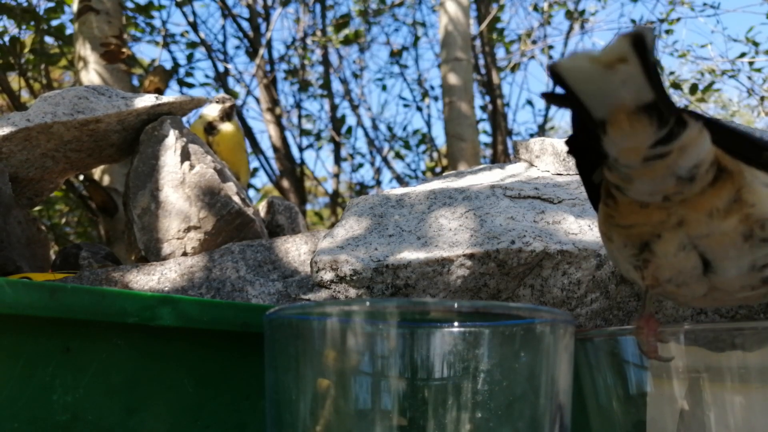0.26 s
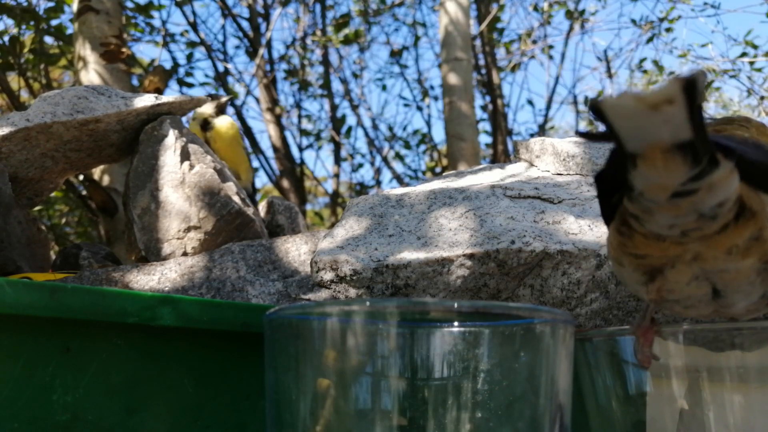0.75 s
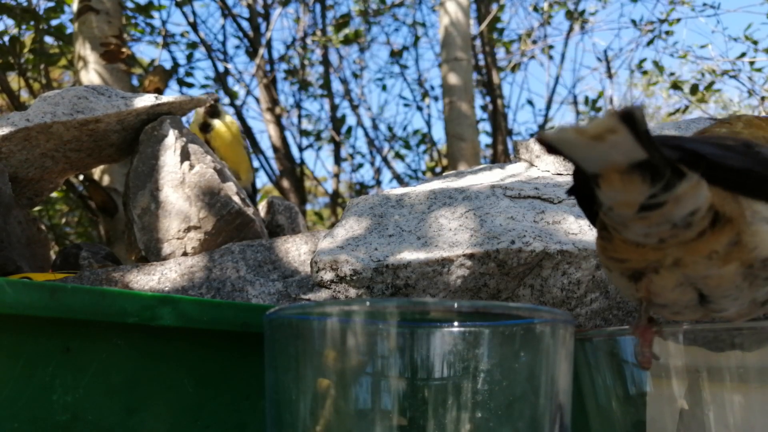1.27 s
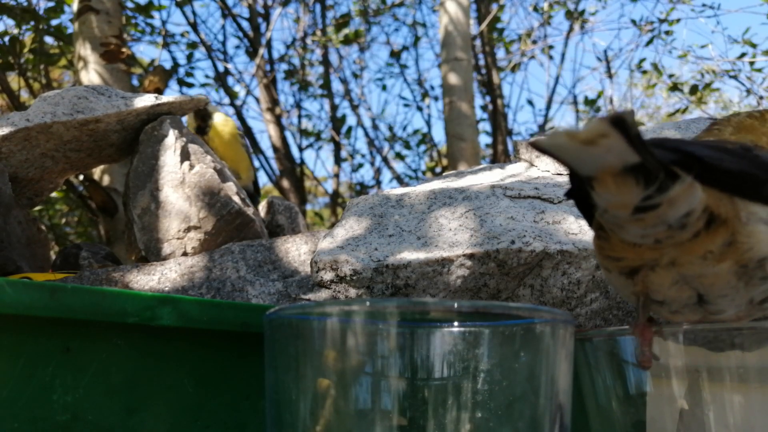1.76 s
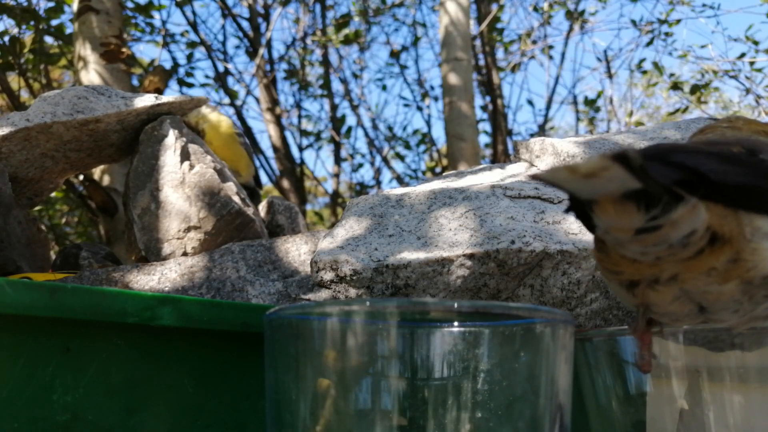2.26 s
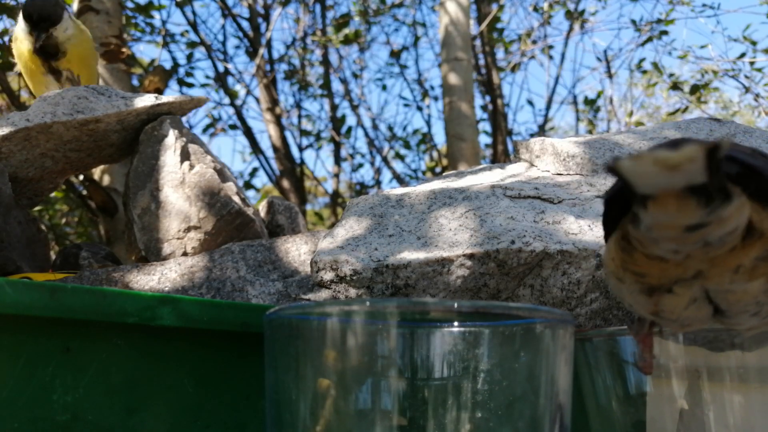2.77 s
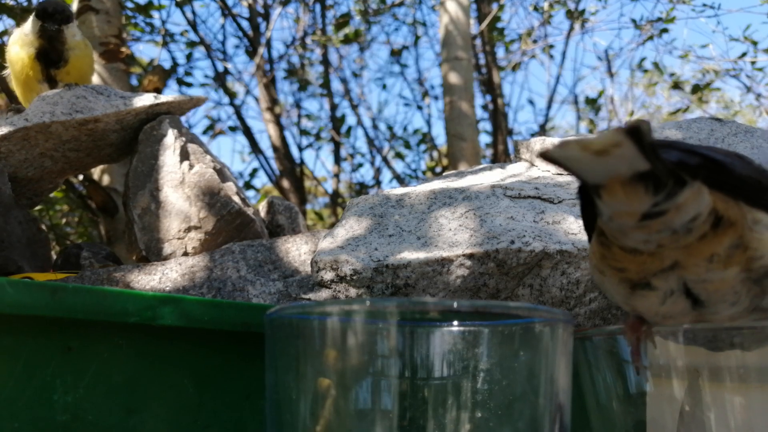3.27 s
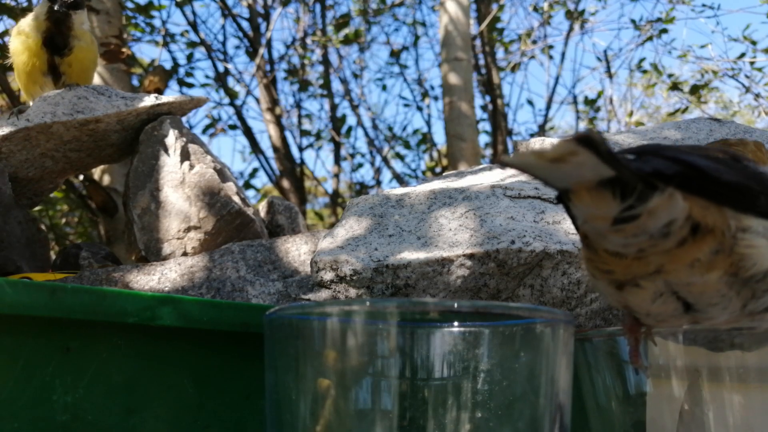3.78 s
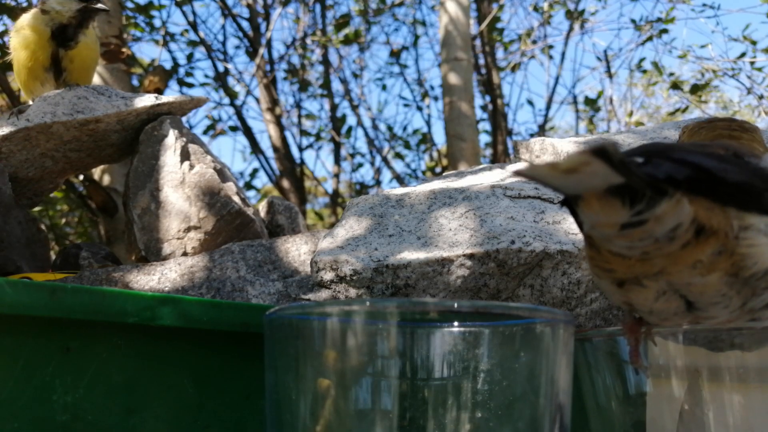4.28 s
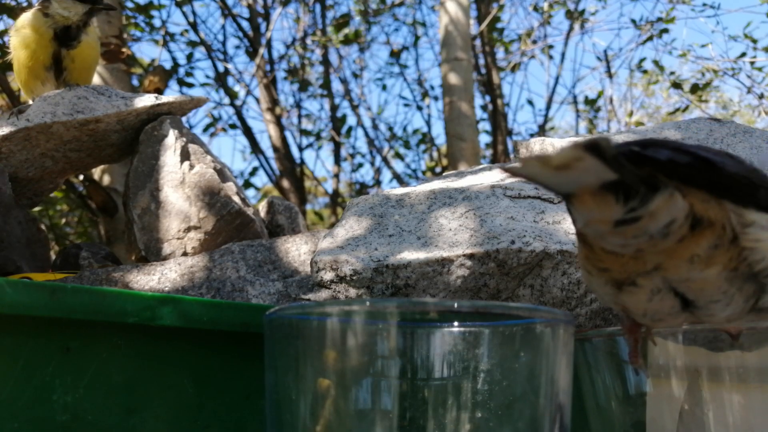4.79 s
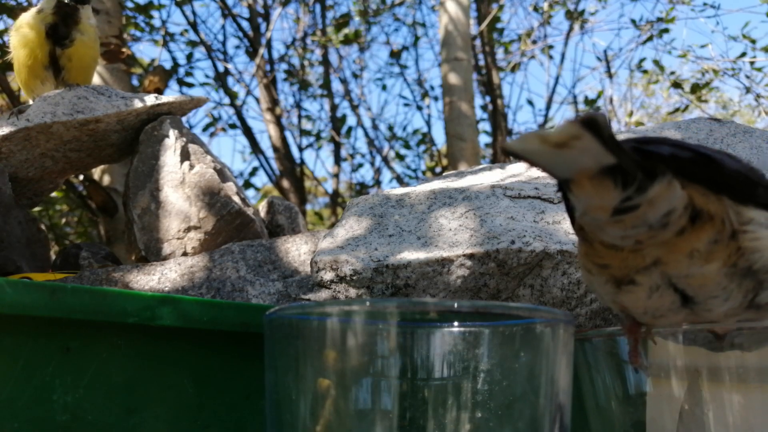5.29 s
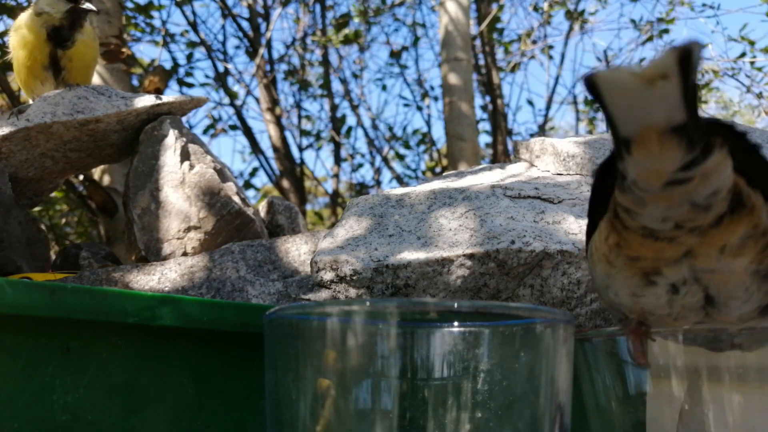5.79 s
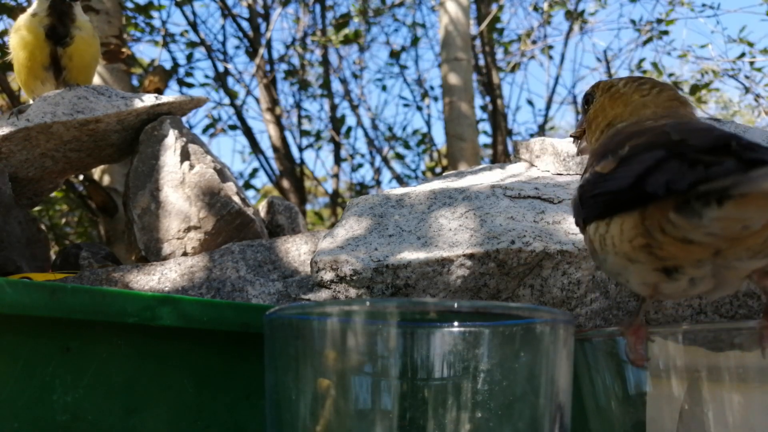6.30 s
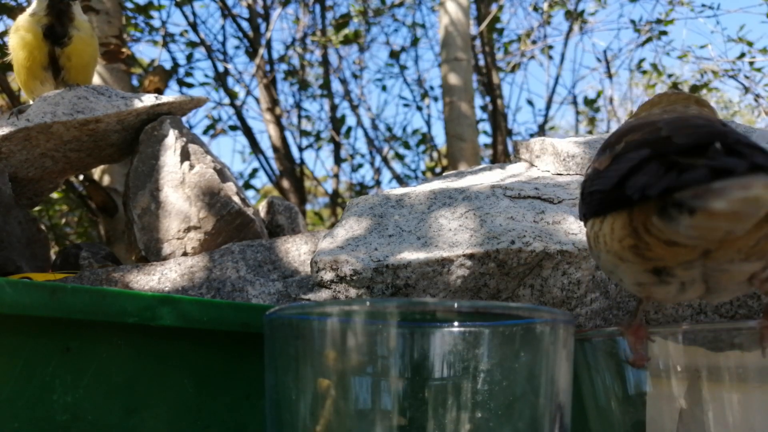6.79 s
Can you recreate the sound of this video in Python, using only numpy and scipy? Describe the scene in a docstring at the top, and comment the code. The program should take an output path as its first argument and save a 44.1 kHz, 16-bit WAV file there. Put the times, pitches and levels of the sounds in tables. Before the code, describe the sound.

Close, dry beak clicks, claw scratches and light thumps on a plastic bird feeder outdoors, mixed with low puffs of wingbeats.

```python
"""At an outdoor feeder, small birds hop, scrabble and peck on a thin plastic tray that carries a
microphone pair and a glass cup. Beaks, claws and feet excite the damped normal modes of the tray,
and claws set the glass ringing. Wing strokes puff on the microphones; they and the footfalls rock
the tray on its mounting. Far off an insect trills by stridulation, over a faint outdoor hush."""
import sys
import numpy as np
from scipy import signal
from scipy.io import wavfile

SR = 44100
rng = np.random.default_rng(int(sys.argv[2]) if len(sys.argv) > 2 else 0)


def wav_record(signal):
    """Record a signal, one row per channel, as 16-bit PCM in the file named by sys.argv[1]."""
    frames = np.transpose(np.atleast_2d(signal))
    bounded = np.clip(frames, -1, 1)
    # unit amplitude maps onto the largest positive 16-bit level
    quanta = np.round(bounded * 32767).astype(np.int16)
    wavfile.write(sys.argv[1], SR, quanta)


N = 310905

# Tabulated levels are relative. Pan is left over right; sharpness is tick over knock.
# Spectral density of the hush: f/Hz, level/dB
HUSH_SPECTRUM = [(20, -3.5), (40, -11), (65, -5.5), (125, -18.5), (250, -13.5), (630, -11.5), (800, -12),
                 (1100, -20.5), (1600, -17), (2500, -20.5), (3200, -25.5), (6300, -28), (7500, -36),
                 (16000, -59.5)]
# Left-right correlation of the hush: f/Hz, coefficient
HUSH_CORRELATION = [(60, 0.079), (130, 0.32), (290, 0.71), (640, 0.71), (1410, -0.45), (3100, -0.093),
                    (6820, 0.13), (15000, 0.15)]
# Side to which the hush leans: f/Hz, pan/dB
HUSH_PAN = [(60, -4), (180, -3.5), (550, -0.5), (1650, -1), (4970, 0), (15000, -13)]

# Sliding claws, one curve per bout: t/s, level/dB, sharpness/dB
SLIDES = [
    [(0.0, -42.5, 4), (0.078, -59.5, 0), (0.144, -57.5, -9), (0.274, -55.5, -1), (0.59, -86, 18),
     (0.95, -85.5, 19)],
    [(3.05, -93, -8), (3.116, -64.5, -1), (3.262, -67, 0), (3.352, -50.5, 1.5), (3.492, -73, -10),
     (3.672, -73, -9.5), (4.3, -80, -3)],
    [(5.49, -70.5, -11), (5.728, -71.5, -12), (5.876, -87, -2), (6.02, -80, 18)],
    [(6.08, -76, -7), (6.184, -78, 3), (6.446, -65.5, 2), (6.546, -63, 1), (6.686, -61, 7),
     (6.92, -67.5, 5), (7.05, -49.5, 1)],
]
# Beak and claw taps: t/s, level/dB, sharpness/dB, pan/dB, favoured knock f/Hz
TAPS = [(.0064,-20,-21,8.5,1710),(.0581,-16.5,-6,6,1870),(.1623,-32.5,-13,3.5,2740),(.1999,-36.5,-10,6.5,1900),
        (.216,-31,-16,5,1950),(.5038,-51.5,13,-14,2160),(.5273,-57,19,-13,3720),(.5457,-33.5,31,-2.5,3720),
        (.5605,-26,23,-4.5,2280),(.6582,-50.5,11,0.5,2150),(.7826,-46.5,-5,3.5,2090),(.9906,-62,28.5,6.5,2260),
        (1.2493,-44,12.5,-4,2100),(1.3394,-50.5,16,-8,2080),(1.4596,-41,3,-1,3000),(1.4623,-39.5,4,-3,2060),
        (1.5021,-43.5,6.5,-2.5,2450),(1.575,-50,6,-3,3600),(1.5864,-35,9.5,0,3480),(1.6118,-51,8,1,1520),(1.6541,-42.5,22,0,4040),
        (1.7324,-55,17,-12,1530),(1.7401,-43.5,33,-4.5,1530),(1.8323,-30,12,-0.5,1630),(2.028,-57.5,28,-3.5,3700),
        (2.0902,-59,13,-5,2930),(2.0986,-55.5,8,-1,2930),(2.1743,-52,18,-13,2456),(2.2518,-52.5,11,-0.5,3500),(2.33,-59,12.5,-2,2400),
        (2.4703,-56,12,3.5,2550),(2.7778,-58.5,-29,1,2100),(2.9701,-55,-10,4.5,2070),
        (3.2508,-28.5,-2.5,-0.5,2670),(3.3031,-35.5,-12,0.5,2950),(3.3576,-34,-9.5,5,2550),(3.3755,-44.5,-2.5,2.5,2800),
        (4.4483,-52,-3,-3,3500),(4.7785,-54,-11,-1.5,3490),(5.5422,-44,-7,-3.5,2100),(5.6047,-44,-21,-3.5,3520),
        (5.6425,-48,-19,-6,3400),(5.671,-45.5,-9.5,-4.5,3490),(5.7478,-46.5,-3.5,-3.5,2900),(5.7632,-37,-6,-5,3700),
        (5.7724,-47,-3,-3,3490),(5.8308,-54,13,-17,3760),(5.8445,-40,0.5,-5,3340),(5.8517,-40,19,1,3520),
        (5.8654,-42,14,1,3700),(5.8722,-43,19,-12,2150),(5.885,-32.5,14.5,0.5,3490),(5.9358,-60,14,-9,2279),
        (6.2218,-50,-22,14.5,1510),(6.2282,-48,-19,-22.5,1470),(6.2339,-50,-19,-7,1520),(6.2473,-61,8,-12,1420),
        (6.3357,-40,3.5,-11.5,4100),(6.37,-52,7,-1,2260),(6.3961,-46,-7,1,2730),(6.4468,-49.5,2,0,2760),
        (6.4587,-55,2,1.5,2570),(6.5181,-46.5,-3,4,2440),(6.5293,-46.5,6,-2.5,2380),(6.6491,-35,-8.5,6,2550),
        (6.6814,-34.5,22,-2.5,1550),(6.6866,-32.5,3.5,1,1440),(6.6969,-35,-11,6.5,1520),(6.7022,-34,8,2.5,1570),
        (6.7136,-40,-13,23,1360),(6.7293,-40,-1,8,1750),(6.7737,-46.5,11,5.5,3420),(6.8866,-55,-19,19,1390),
        (6.9332,-38.5,5.5,6.5,1500),(6.9444,-45.5,-2.5,9,1400),(6.992,-48.5,-2,16,1630),(7.013,-33,-26,15,1670),
        (7.0243,-48,-3,3.5,2930),(7.0404,-40.5,-5.5,24,3730)]
# Claws dragged a short way: t/s, level/dB, sharpness/dB, pan/dB, favoured knock f/Hz
SCUFFS = [(.0206,-28,-4.5,4,2060),(.073,-41,-6,4,2600),(.109,-47,-19,6,2660),(.117,-39,9,0.5,2060),
          (.173,-41,-1,4.5,2040),(.2288,-37.5,-1,2.5,2100),(.282,-47.5,-1,5,2000),(.3075,-42,30,-10,3490),
          (.3496,-55,8,-0.5,1900),(.3823,-42,31,-8,1460),(.442,-51.5,11,-3.5,1330),(.4806,-47.5,24,-3.5,3550),
          (.5236,-44,18,-11,3710),(.645,-67,15,-3,2130),(.7295,-58.5,16.5,1.5,1350),(.7585,-55,27,0,2348),
          (3.102,-48,-12.5,5.5,1610),(3.161,-47.5,-12,4.5,1600),(3.2566,-35,-13,3.5,2460),(3.2886,-44,1,4,2200),
          (3.327,-50,-19,4,2600),(3.503,-65,-21,-8,2330),(3.5613,-54.5,-16,-2,1960),(3.646,-66,-23,-7,2370),
          (3.7497,-60,-27,-10.5,1650),(3.7794,-62.5,-13.5,-6.5,2390),(3.904,-64,-12.5,-0.5,2090),(4.004,-62.5,-15,-9,2670),
          (4.069,-61,-20,-9.5,1540),(4.172,-62,-17,-9.5,2020),(5.5155,-49,-17,-6,3560),(5.786,-57,0,-5.5,3780),
          (6.296,-51.5,-31,-1,2490),(6.346,-55,10,-2,2570),(6.4274,-56,12,-7.5,2450),(6.4936,-51,7,1.5,2590),
          (6.552,-43,-1,3.5,2560),(6.603,-41.5,-2,1.5,2600),(6.6287,-37.5,-9,4,2600),(6.829,-52,16,4,1560),
          (6.876,-52.5,10,6.5,1460),(6.9154,-46.5,1,5,1450)]
# Feet coming down: t/s, level/dB, pan/dB
FOOTFALLS = [(0.006, -14.5, 0.5), (0.036, -43, 0), (0.199, -23.5, -1.5), (0.216, -25.5, 4), (0.262, -27, 2),
             (3.249, -31.5, -18.5), (3.328, -27.5, -3), (3.349, -32, -2), (3.564, -47.5, -19),
             (3.645, -43.5, -6.5), (3.857, -46.5, -6), (6.122, -37, -3.5), (6.147, -41, -8),
             (6.369, -37, -3.5), (6.516, -44.5, -25), (6.697, -24.5, 15), (6.716, -32.5, 19)]
# Claws knocking the cup: t/s, level/dB
CLINKS = [(0.0394, -47), (0.2319, -38.5), (0.7794, -56.5), (1.2496, -55), (3.2694, -41), (5.677, -59),
          (6.0631, -68), (6.0921, -62.5), (6.1185, -48.5), (6.1474, -48.5), (6.1719, -53)]
# Wing strokes at the microphones: t/s, level/dB
WING_STROKES = [(0.09, -32), (0.259, -28), (0.33, -44), (0.37, -39), (0.409, -33), (0.446, -31.5),
                (0.491, -36), (0.529, -54), (0.846, -50), (2.967, -37), (2.994, -46), (3.098, -30),
                (3.127, -28), (3.138, -28), (3.171, -26), (3.184, -61), (3.213, -64), (3.341, -27.5),
                (5.522, -42.5), (6.123, -35.5), (6.145, -43), (6.166, -51), (6.697, -52)]

# Tray modes in four families, from low to high: f/Hz, level/dB, T60/s
THUD_MODES = [(210, -7, 0.022), (306, -3, 0.031), (450, 1, 0.02), (659, 2, 0.02), (732, -1.5, 0.016),
              (903.4, -4.5, 0.034), (1043, -4, 0.015)]
KNOCK_MODES = [(1330, -4, 0.027), (1512, 1, 0.029), (1693, 2, 0.017), (2060, 3.5, 0.02), (2282, -1, 0.031),
               (2483, 4.5, 0.019), (2750, -3.5, 0.038), (2967, -0.5, 0.023), (3490, -3, 0.029),
               (3805, 8, 0.0058)]
TICK_MODES = [(4340, -10.5, 0.013), (4550, -5, 0.0091), (5447, 3, 0.0054), (5975, -3.5, 0.016),
              (6540, -1, 0.0097), (7130, -0.5, 0.013), (7750, -3.5, 0.02), (8255, -4, 0.0086),
              (9290, -6.5, 0.0046)]
TOP_MODES = [(9920, 2.5, 0.0024), (11040, -1, .005), (12140, 1.5, 0.004), (13860, -15.5, 0.0039),
             (14800, -0.5, 0.0033)]
# Extra drive of the lowest and highest families in taps, scuffs and slips: t/s, level/dB
THUD_DRIVE = [(0, 1), (.15, 2.5), (.5, 3), (1.5, 0), (3.1, 5), (3.3, 6), (3.6, 3.5), (4.1, -3.5), (5.5, -6),
              (5.9, -14), (6.2, 2), (6.5, 5.5), (6.7, -5), (7.05, 3)]
TOP_DRIVE = [(0, -28), (.15, -8), (.3, -21), (.5, -26), (.9, -29), (1.25, -16), (1.65, -22), (2.1, -31.5),
             (3.1, -32.5), (3.4, -6.5), (5.55, -24), (5.75, -8.5), (5.95, -2.5), (6.15, -7), (6.4, -12),
             (6.7, -17), (7.05, -12)]
# Broad resonances of the tray on its mounting: f/Hz, bandwidth/Hz, level/dB
SWAY_RESONANCE = [(29.8, 41, 0)]
RUMBLE_RESONANCES = [(73.4, 13, -10), (108.3, 28, -12), (164.4, 120, -4)]
# Modes of the glass cup: f/Hz, level/dB, T60/s
CUP_MODES = [(2140, -17, 0.19), (2057, -16, 0.15), (4854, -5.5, 0.07), (4850, -7.5, 0.078),
             (8550, -17.5, 0.035)]
# Resonances of the insect's wings: f/Hz, bandwidth/Hz, level/dB
INSECT_RESONANCES = [(7380, 660, -5.5), (7970, 230, 0.5), (8270, 83, -2), (8810, 180, -6),
                     (8670, 590, -4.5), (9800, 3000, -9.5)]


def from_db(db):
    """The decibel scale is logarithmic: 20 dB is a factor of ten in amplitude."""
    return 10 ** (np.asarray(db) / 20)


def unit_rms(x):
    """Normalisation: a signal divided by its rms has unit mean power."""
    return x / np.sqrt(np.mean(x ** 2) + 1e-20)


def at_hz(spectrum, hz):
    """Interpolation in log frequency gives every octave equal width."""
    known_hz, values = np.transpose(spectrum)
    return np.interp(np.log(hz), np.log(known_hz), values)


def drift(rate_hz):
    """Low-pass filtering turns white noise into a slow fluctuation of unit rms."""
    step = 40
    pole = np.exp(-2 * np.pi * rate_hz * step / SR)
    noise = rng.standard_normal(N // step + 2002)
    slow = signal.lfilter([1], [1, -2 * pole, pole * pole], noise)[2000:]
    return np.interp(np.arange(N) / step, np.arange(len(slow)), unit_rms(slow))


def ring(impulses, hz, t60):
    """A damped oscillator answers each impulse with an exponentially decaying sine."""
    pole, angle = from_db(-60 / (t60 * SR)), 2 * np.pi * hz / SR
    return signal.lfilter([0, np.sin(angle)], [1, -2 * pole * np.cos(angle), pole ** 2], impulses + 1e-18)


def resonate(force, resonances):
    """Forced vibration: parallel resonances each pass a band of the force; the sum has unit rms."""
    out = 0
    for k, (hz, width_hz, level_db) in enumerate(resonances):
        pole = np.exp(-np.pi * width_hz / SR)
        section = [1, 0.0004, -1, 1, -2 * pole * np.cos(2 * np.pi * hz / SR), pole * pole]
        out = out + (-1) ** k * from_db(level_db) * unit_rms(signal.sosfilt([section] * 2, force))
    return unit_rms(out)


def strike(modes, times, level_db, pan_db, shading, uneven_db, spot_hz=0):
    """Modal superposition: impacts excite each mode unevenly; the far microphone lags and is shaded."""
    scatter = rng.normal(0, 1, (len(times), len(modes), 3))
    lag_s = .00048 * np.tanh(pan_db / 6)
    out = np.zeros((2, N))
    for k, (hz, mode_db, t60) in enumerate(modes):
        impulses = np.zeros((2, N))
        # the spot that is touched favours the modes near its own pitch
        octaves_off = np.abs(np.log2(hz / np.maximum(spot_hz, 1)))
        spot_db = np.where(spot_hz > 0, -np.minimum(27 * octaves_off, 9.5), 0)
        for mic, side in enumerate((.5, -.5)):
            arrivals = np.clip(np.round((times - side * lag_s) * SR).astype(int), 0, N - 1)
            coupling_db = spot_db + uneven_db * (scatter[:, k, 2] + .5 * scatter[:, k, mic])
            heights = from_db(level_db + mode_db + side * shading * pan_db + coupling_db)
            np.add.at(impulses[mic], arrivals, (-1) ** k * heights)
        out += ring(impulses, hz, t60)
    return out


def hush(level_db=-68):
    """Far traffic and leaves form a partly coherent field, flickering in third-octave bands of noise."""
    out, common_drift = 0, drift(1.5)
    edges_hz = 20 * 2 ** (np.arange(30) / 3)
    white = rng.standard_normal((2, 2, N))
    for k, (low, high) in enumerate(zip(edges_hz, edges_hz[1:])):
        bandpass = signal.butter(2, [low, high], "band", fs=SR, output="sos")
        mid, side = signal.sosfilt(bandpass, white[k % 2])
        hz = np.sqrt(low * high)
        correlation = at_hz(HUSH_CORRELATION, hz)
        band = np.sqrt(1 + correlation) * mid + np.sqrt(1 - correlation) * side * [[1], [-1]]
        band_db = at_hz(HUSH_SPECTRUM, hz) + 1.3 * common_drift + 1.9 * drift(16)
        lean_db = at_hz(HUSH_PAN, hz) / 2
        out = out + from_db(band_db) * from_db([[lean_db], [-lean_db]]) * band
    return from_db(level_db) * unit_rms(out)


def slips(median_per_s=1500):
    """Stick-slip friction: sliding claws catch in random clumps, on the side where the bird scuffs."""
    t = np.arange(N) / SR
    curve_s, level_db, sharp_db = np.concatenate(SLIDES).T
    gate = sum(np.clip(np.minimum(t - bout[0][0], bout[-1][0] - t) / .01 + 1, 0, 1) for bout in SLIDES)
    catches = np.flatnonzero(rng.random(N) < gate * median_per_s * from_db(5 * drift(20)) / SR)
    times = catches / SR
    size_db = 3.1 * np.minimum(rng.exponential(1, N), 5)[catches]
    thud_db = np.interp(times, curve_s, level_db) + size_db
    knock_db = thud_db - 8
    tick_db = knock_db + np.interp(times, curve_s, sharp_db)
    scuff_s, _, _, scuff_pan_db, _ = np.transpose(SCUFFS)
    pan_db = np.interp(times, scuff_s, scuff_pan_db)
    return np.array([times, thud_db, knock_db, tick_db, pan_db, np.zeros(len(times))])


def impact_trains(touches, count, length_s, first_db, fade_db, grain_db, thud_db):
    """A touch is a fading train of impacts; the sharper it is, the more it favours high modes."""
    onset_s, touch_db, sharp_db, pan_db, spot_hz = np.transpose(touches)[:, :, None]
    along = rng.random((len(onset_s), count))
    along[:, 0] = 0
    size_db = grain_db * (np.minimum(rng.exponential(1, along.shape), 3) - 1)
    level_db = touch_db + np.where(along == 0, first_db, size_db) - fade_db * along
    knock_db = level_db - np.maximum(sharp_db, 0)
    tick_db = level_db + np.minimum(sharp_db, 0)
    columns = onset_s + along * length_s, knock_db + thud_db, knock_db, tick_db, pan_db, spot_hz
    return np.array([np.broadcast_to(column, along.shape).ravel() for column in columns])


def beaks_and_claws():
    """Impact excitation: rebounding taps, rasping scuffs and slips all drive the same tray modes."""
    taps = impact_trains(TAPS, 12, length_s=.0085, first_db=8.5, fade_db=25, grain_db=2.5, thud_db=-12)
    scuffs = impact_trains(SCUFFS, 34, length_s=.025, first_db=-1, fade_db=9.5, grain_db=3, thud_db=-.84)
    times, thud_db, knock_db, tick_db, pan_db, spot_hz = np.hstack([taps, scuffs, slips()])
    top_db = tick_db + np.interp(times, *np.transpose(TOP_DRIVE))
    thud_db = thud_db + np.interp(times, *np.transpose(THUD_DRIVE))
    return (strike(THUD_MODES, times, thud_db - 16, pan_db, shading=.6, uneven_db=6.5)
            + strike(KNOCK_MODES, times, knock_db - 15.5, pan_db, shading=1, uneven_db=5.5, spot_hz=spot_hz)
            + strike(TICK_MODES, times, tick_db - 12.5, pan_db, shading=1.41, uneven_db=2)
            + strike(TOP_MODES, times, top_db - 14.5, pan_db, shading=.85, uneven_db=6))


def feet(cutoff_hz=1500):
    """A soft impact acts as a low-pass filter: footfalls excite only the low modes of the tray."""
    times, level_db, pan_db = np.transpose(FOOTFALLS)
    thumps = strike(THUD_MODES, times, level_db - 5.5, pan_db, shading=1, uneven_db=3)
    return signal.lfilter(*signal.butter(2, cutoff_hz, fs=SR), thumps)


def decaying_power(events, t60):
    """Damping: the power from each event rises smoothly, then decays exponentially."""
    times, level_db = np.transpose(events)[:2]
    jumps = np.full(N, 1e-18)
    jumps[(times * SR).astype(int)] = from_db(level_db) ** 2
    power = signal.lfilter([1], [1, -from_db(-120 / (t60 * SR))], jumps)
    rise = np.hanning(int(.016 * SR))
    return np.convolve(power, rise / rise.sum())[:N]


def rocking():
    """Resonance of the mounting: wing strokes leave it swaying; strokes and footfalls, rumbling."""
    noise = rng.standard_normal((3, N)) * from_db(4.8 * drift(31))
    force = noise[0] + .45 * noise[1:]   # nearly alike in both microphones
    sway = from_db(-13) * np.sqrt(decaying_power(WING_STROKES, t60=.3))
    wing_power = from_db(-17) ** 2 * decaying_power(WING_STROKES, t60=.32)
    foot_power = from_db(-18.5) ** 2 * decaying_power(FOOTFALLS, t60=.32)
    rumble = np.sqrt(wing_power + foot_power)
    return sway * resonate(force, SWAY_RESONANCE) + rumble * resonate(force, RUMBLE_RESONANCES)


def cup(chatter_s=.016):
    """Free vibration: a claw chatters on the glass, which rings on while its close mode pairs beat."""
    onset_s, clink_db = np.transpose(CLINKS)[:, :, None]
    along = rng.random((len(onset_s), 4))
    along[:, 0] = 0
    times = (onset_s + chatter_s * along).ravel()
    level_db = (clink_db - 3 - 8 * along).ravel()
    return strike(CUP_MODES, times, level_db, pan_db=-8, shading=.9, uneven_db=5)


def wings(puff_hz=106):
    """Each stroke displaces air in a blunt pulse of push and suction, and sets the tray nodding."""
    times, level_db = np.transpose(WING_STROKES)
    phase = 2 * np.pi * puff_hz * np.arange(int(.06 * SR)) / SR
    pulse = -phase ** 2 * (1 - .21 * phase) * np.exp(-phase)
    strokes = np.zeros((2, N))
    strokes[:, (times * SR).astype(int)] = from_db(level_db + 6.5 + rng.normal(0, 1, (len(times), 2)).T)
    puffs = signal.fftconvolve(strokes, pulse[None])[:, :N]
    nod = from_db(-14) * ring(strokes, hz=67, t60=.25)
    return puffs + nod


def insect(start_s=1.27, swell_s=.18, end_s=5.27, fade_s=.017, strokes_per_s=62):
    """Stridulation: each stroke is a noisy burst of tooth strikes that drives the wing resonances."""
    t = np.arange(N) / SR
    envelope = np.clip(np.minimum((t - start_s) / swell_s, (end_s - t) / fade_s), 0, 1)
    strokes = 1 + .48 * np.sin(2 * np.pi * strokes_per_s * t)
    unsteadiness = from_db(drift(8))
    buzz = resonate(rng.standard_normal((2, N)) * strokes * unsteadiness, INSECT_RESONANCES)
    return envelope * buzz * from_db([[-78.5], [-74.5]])   # louder on the right


def scene():
    """Linear superposition: the pressures of all sources add at each microphone."""
    return hush() + beaks_and_claws() + feet() + rocking() + cup() + wings() + insect()


def record(dry, ceiling=.45, cutoff_hz=16300):
    """Soft saturation rounds the loudest peaks; a steep low-pass filter limits the bandwidth."""
    lowpass = signal.cheby2(12, 70, cutoff_hz, fs=SR, output="sos")
    return signal.sosfilt(lowpass, ceiling * np.tanh(dry / ceiling))


dry = scene()
out = record(dry)
wav_record(out)
```